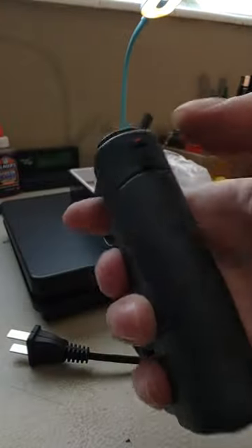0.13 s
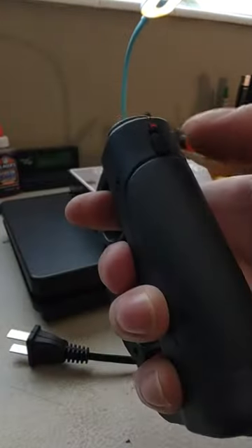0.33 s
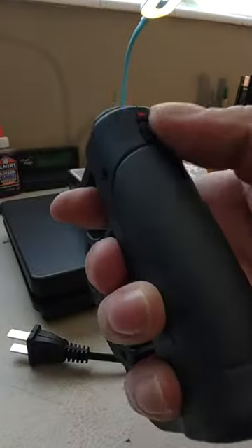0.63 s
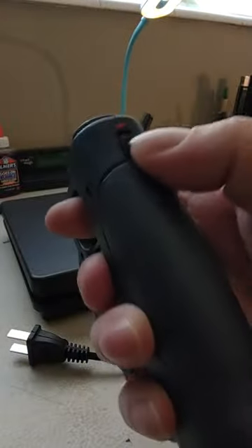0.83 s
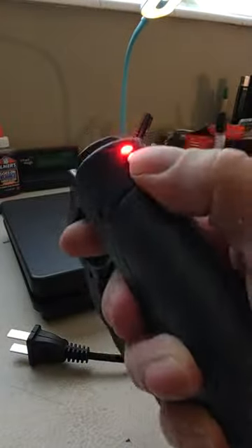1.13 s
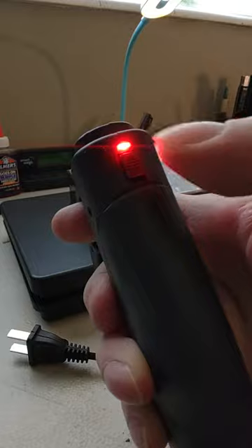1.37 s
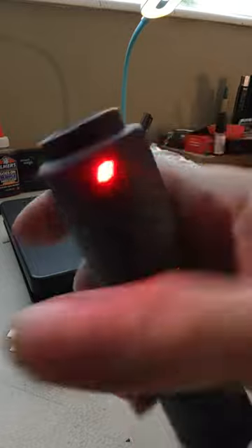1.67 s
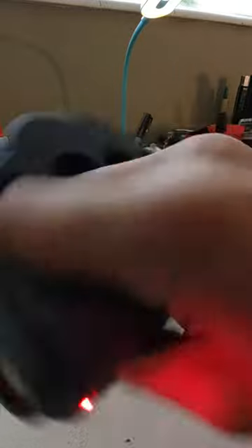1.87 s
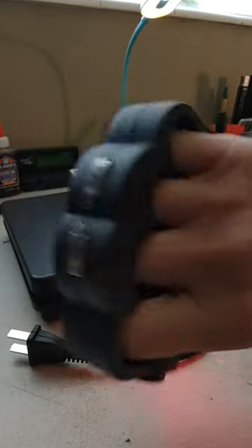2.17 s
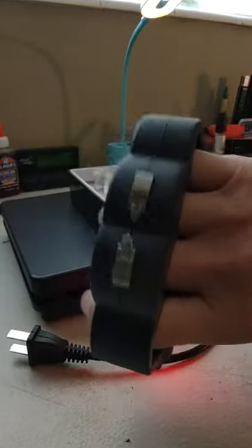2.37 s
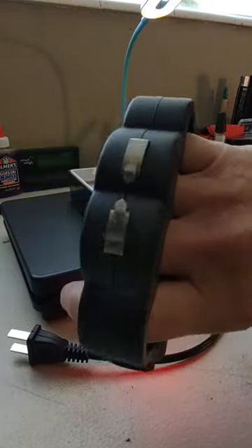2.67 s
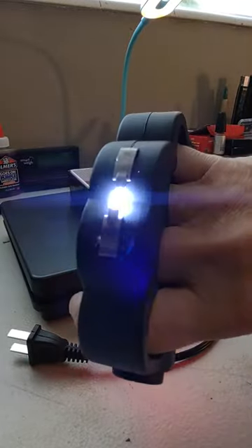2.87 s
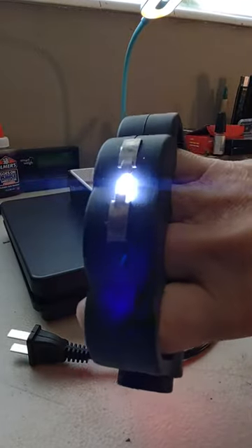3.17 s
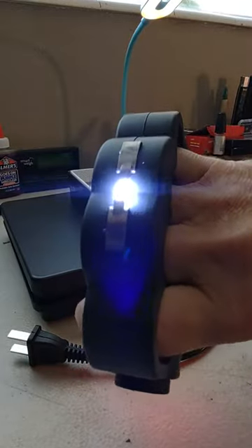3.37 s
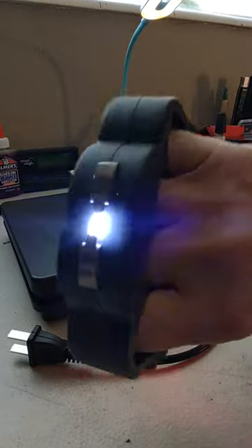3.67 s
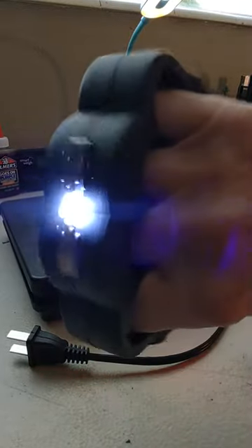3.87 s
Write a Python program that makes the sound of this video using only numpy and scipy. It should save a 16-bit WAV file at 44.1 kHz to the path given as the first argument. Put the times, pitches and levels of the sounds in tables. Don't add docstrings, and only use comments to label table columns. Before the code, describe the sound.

Harsh electric arc crackles in a loud rapid buzz after small switch clicks in a room

```python
import sys
import numpy as np
from scipy import signal
from scipy.fft import rfft, irfft, next_fast_len
from scipy.io import wavfile
from scipy.ndimage import uniform_filter1d, map_coordinates

SR = 44100
rng = np.random.default_rng(int(sys.argv[2]) if len(sys.argv) > 2 else 0)


def digitize_waveform(pressure):
    field = np.atleast_2d(pressure).T
    bounded = np.clip(field, -1, 1)
    quanta = np.round(bounded * 32767).astype(np.int16)
    wavfile.write(sys.argv[1], SR, quanta)


def level_to_linear(level):
    exponent = np.asarray(level, float) / 20
    return 10 ** exponent


N = 176400

# frequency in Hz, correlation.
ALIKE = [(60, 0.51), (180, 0.94), (550, 0.62), (1650, -0.54), (4970, -0.34), (15000, -0.67)]


def unit(x):
    return x / np.sqrt(np.mean(x ** 2) + 1e-20)


def along(points, hz):
    point_hz, value = np.transpose(points)
    return np.interp(np.log(hz + 1), np.log(point_hz + 1), value)


def wobble(rate_hz):
    knots = rng.standard_normal(int(N * rate_hz / SR) + 4)
    return map_coordinates(knots, [np.arange(N) * rate_hz / SR])


def filtered(x, response):
    size = next_fast_len(x.shape[-1] + 8192)
    spectrum = rfft(x, size) * response(np.fft.rfftfreq(size, 1 / SR))
    return irfft(spectrum, size)[..., :x.shape[-1]]


def bell(hz, centre_hz, wide):
    return np.exp(-(np.log((hz + 1) / centre_hz) / wide) ** 2)


def push(t, rise_s, fall_s):
    age = np.abs(t)
    return (1 - np.exp(-age / rise_s)) * np.exp(-age / fall_s) * (t > 0)


def decay(t, t60_s, db=0):
    return level_to_linear(db - 60 * t / t60_s)


def panned(db, pan_db):
    return level_to_linear(db + np.array([[pan_db], [-pan_db]]) / 2)


def rush(colour, alike, patchy_db):
    z = signal.stft(rng.standard_normal((2, N)), nperseg=512)[2]
    field = uniform_filter1d(rng.standard_normal(z.shape[1:]), 6, 0)
    field = uniform_filter1d(field, 8, 1)
    pair = signal.istft(z * level_to_linear(patchy_db * unit(field)), nperseg=512)[1][:, :N]

    def mid_side_gain(hz):
        angle = np.arccos(np.clip(along(alike, hz), -1, 1)) / 2
        return level_to_linear(along(colour, hz)) * [np.cos(angle), np.sin(angle)]

    mid, side = filtered(pair, mid_side_gain)
    return unit(np.array([mid + side, mid - side]))


def add(out, start_s, x):
    i = int(round(start_s * SR))
    out[:, i:i + x.shape[1]] += x[:, :max(out.shape[1] - i, 0)]


def arc():
    # time in seconds, level in dB, grip resonance in dB, depth of the shadow below it in dB.
    arc_course = [
        (2.93, -18.5, 3, 8.5),
        (3.218, -21, 1.5, 5.5),
        (3.45, -19.5, 1, 0),
        (3.91, -21, -0.5, 4.5),
        (4.0, -18, 4, 2),
    ]
    # peak over crack in dB, rise in s, fall in s, rebound share, rebound delay in s.
    overload = [
        (12, 0.00029, 0.0019, 0.37, 0.00393),
        (13, 0.00013, 0.00065, 0.64, 0.00461),
    ]
    times_s = spark_times()
    count = len(times_s)
    when_s, *columns = np.transpose(arc_course)
    level_db, grip_db, shadow_db = (np.interp(times_s, when_s, c)[:, None, None] for c in columns)
    size_db = 0.5 * rng.standard_normal((count, 2))
    left_lag_s = 0.00022
    t = np.arange(SR // 4) / SR - np.array([[left_lag_s], [0]])
    late_s = np.maximum(t - .0006, 0)

    vary = np.exp(.15 * rng.standard_normal((count, 2, 4)))
    vary[:, :, 0] *= 1 + 0.85 * np.linspace(-.5, .5, count)[:, None]
    paths = echo_paths(count, t.shape)
    booms = boom(paths, late_s)
    cracks = crack_envelope(late_s) * crack_noise(paths, grip_db, shadow_db)

    out = np.zeros((2, N))
    for k, start_s in enumerate(times_s):
        thumps = np.array([thump(t[c], overload[c], vary[k, c]) for c in (0, 1)])
        add(out, start_s, level_to_linear(level_db.mean() + size_db[k, 0]) * (thumps + booms[k]))
        add(out, start_s, level_to_linear(level_db[k] + 2.5 + size_db[k, 1]) * cracks[k])
    return out


def spark_times():
    # time in seconds, sparks fired so far.
    fired = [
        (2.929, 0),
        (3.042, 5),
        (3.1532, 10),
        (3.2746, 15),
        (3.3842, 20),
        (3.5348, 27),
        (3.6621, 33),
        (3.82, 41),
        (3.9955, 49),
    ]
    due_s, total = np.transpose(fired)
    count = int(total[-1]) + 1
    stray_s = .0012 + .0016 * rng.standard_normal(count)
    stray_s[0] = 0
    return np.interp(np.arange(count), total, due_s) - .0022 + stray_s


def thump(t, row, vary):
    db, rise_s, fall_s, share, delay_s = row
    pulse = push(t, rise_s, fall_s * vary[0])
    pulse = pulse - share * vary[1] ** 2 * push(t - delay_s * vary[2] + 0.0006, 0.00057, .0012)
    pulse = pulse + 0.13 * vary[3] ** 2 * push(t - 0.00974, rise_s, fall_s)
    return level_to_linear(db) * pulse / pulse.max()


def echo_paths(count, shape):
    warm_up = 5
    fresh = rng.standard_normal((count + warm_up, *shape))
    return signal.lfilter([1], [1, -.75], fresh, axis=0)[warm_up:]


def boom(paths, late_s):
    # frequency in Hz, density in dB per Hz.
    boom_colour = [(40, -12), (90, 9.5), (250, -0.5), (400, 1), (700, -29)]
    noise = unit(filtered(paths + 0.49 * paths[:, ::-1], lambda hz: level_to_linear(along(boom_colour, hz))))
    return noise * level_to_linear(-2) * push(late_s, 0.0054, .08 / np.log(1000))


def crack_envelope(late_s):
    burst_t60_s, wall_s = .014, .0068
    shape = decay(late_s, burst_t60_s, 4)
    shape = shape + level_to_linear(-1) * push(late_s - wall_s, 0.0014, burst_t60_s / np.log(1000))
    shape = shape + decay(late_s, 0.13) + decay(late_s, 0.58, -2.5)
    clumps_db = 2 * np.array([wobble(890), wobble(880)])[:, :late_s.shape[1]]
    return (1 - np.exp(-late_s / 0.00021)) * shape * level_to_linear(clumps_db)


def crack_noise(paths, grip_db, shadow_db):
    # frequency in Hz, density in dB per Hz.
    crack_colour = [(200, -18), (500, -8), (1200, -4.5), (2400, -3), (4000, -0.5), (7000, -2.5),
                    (13000, -5.5), (16000, -7.5)]

    def response(hz):
        grip = bell(hz, 3900, .14) + 2.07 * bell(hz, 730, 0.37)
        return level_to_linear(along(crack_colour, hz) + grip_db * grip - shadow_db * bell(hz, 2350, .18))

    return unit(filtered(paths, response))


def switch():
    # start in seconds, peak in dB, ring in Hz, left minus right in dB, brightness in dB.
    clicks = [
        (1.0172, -32, 4280, -5, -6),
        (1.052, -35, 2830, -8, 1),
        (1.2548, -29.5, 7200, 4.5, -6.5),
        (1.318, -37.5, 2750, -6, -12),
        (1.3982, -47.5, 3960, 2, -5),
        (1.7075, -25, 7740, -7, -9),
        (1.7087, -26, 4150, 0, -8),
        (1.7124, -28.5, 3920, 4, -9),
        (2.9028, -10, 5030, -1.5, -14.5),
    ]
    out, t = np.zeros((2, N)), np.arange(SR // 8) / SR
    knock = decay(t, 0.029, -18) * np.sin(2 * np.pi * 610 * t)
    rise = 1 - np.exp(-t / 0.00049)
    for start_s, db, ring_hz, pan_db, bright_db in clicks:
        noise = rng.standard_normal((3, 2, len(t)))
        ring = unit(filtered(noise[0], lambda hz: bell(hz, ring_hz, 0.28)))
        snap, tail = unit(filtered(noise[1:], lambda hz: bell(hz, ring_hz, 1.1)))
        body = ring * decay(t, 0.015) + snap * decay(t, 0.011, 8 + bright_db)
        body = body + tail * decay(t, .1, -27) + knock
        add(out, start_s, panned(db - 7, pan_db) * body * rise)
    return out


def hand():
    # middle in seconds, length in seconds, level in dB, left minus right in dB.
    rubs = [(.066, 0.056, -52.5, -3), (0.629, 0.078, -57.5, 1), (.75, 0.16, -63.5, -2),
            (.84, 0.11, -65.5, -2), (0.964, 0.19, -72, 0), (1.058, 0.057, -50.5, 6),
            (1.295, 0.099, -65, -1), (1.359, 0.083, -58.5, 0), (1.702, 0.0071, -53, 6),
            (1.74, 0.059, -62, 3), (1.792, 0.084, -52.5, -1), (1.897, 0.14, -56, -2),
            (2.02, 0.032, -61.5, -2), (2.065, 0.071, -59, -1), (2.104, 0.16, -64.5, -6),
            (2.3, 0.19, -68, -3), (2.471, 0.11, -55.5, -4), (2.67, 0.096, -72, -4)]
    focus_hz = [1940, 4400, 6200, 6050, 4000, 10700, 11500, 4340, 5500, 5000, 10400, 5100, 7000, 7460, 4400,
                4960, 13000, 4000]
    # frequency in Hz, density in dB per Hz.
    skin_colour = [(900, -9), (1800, -9.5), (4500, -1.5), (8500, -5), (11500, -5), (16000, -10.5)]
    out = np.zeros((2, N))
    skin = level_to_linear(1.8 * wobble(350)) * rush(skin_colour, [(1000, 0.042)], patchy_db=0.8)
    for (middle_s, length_s, db, pan_db), centre_hz in zip(rubs, focus_hz):
        i = int((middle_s - length_s / 2) * SR)
        progress = np.arange(int(length_s * SR)) / SR / length_s
        stroke = skin[:, i:i + len(progress)]
        grain = unit(filtered(stroke, lambda hz: level_to_linear(6 * bell(hz, centre_hz, .12))))
        add(out, i / SR, panned(db, pan_db) * np.sin(np.pi * progress) ** 2 * grain)
    return out


def car():
    # time in seconds, nearness as level in dB.
    approach = [
        (0.0, -70.5),
        (0.19, -70),
        (1.37, -65),
        (1.7, -63.5),
        (2.14, -61.5),
        (2.88, -60.5),
    ]
    # frequency in Hz, density in dB per Hz.
    engine_colour = [(150, -0.5), (270, 3), (400, -3.5), (600, 1.5), (900, 2.5), (1100, -2), (2000, -19.5)]
    tyre_colour = [(800, -12), (1300, -5.5), (1900, -8), (2600, -31), (5000, -36)]
    rumble_colour = [(25, -38), (45, -18), (60, 10), (85, -19), (120, 3), (170, -14.5), (260, -22.5),
                     (400, -58)]
    near_db = np.interp(np.arange(N) / SR, *np.transpose(approach))
    rise_db = near_db - near_db.max()
    engine = level_to_linear(near_db + wobble(3.52)) * rush(engine_colour, ALIKE, patchy_db=2.3)
    tyres = level_to_linear(near_db.max() - 6.5 + 1.5 * rise_db) * rush(tyre_colour, ALIKE, patchy_db=4.0)
    rumble = level_to_linear(-62 + 0.39 * rise_db + wobble(6.2)) * rush(rumble_colour, ALIKE, patchy_db=-0.6)
    return engine + tyres + rumble


def fan():
    # frequency in Hz, relative width, level in dB.
    resonances = [(253, .07, -76), (564, .07, -70), (854, .05, -68)]
    air = rush([(100, 0)], ALIKE, patchy_db=2.0)
    return filtered(air, lambda f: sum(level_to_linear(db + 16) * bell(f, hz, wide) for hz, wide, db in resonances))


def mains_hum():
    # frequency in Hz, level in dB.
    harmonics = [(60, -76), (120, -74)]
    t, hum = np.arange(N) / SR, np.zeros(N)
    for hz, db in harmonics:
        hum += level_to_linear(db + 3.5 * wobble(9)) * np.sin(2 * np.pi * hz * t + 1.3 * wobble(9))
    return hum


def hiss():
    # frequency in Hz, density in dB per Hz.
    hiss_colour = [(500, -10), (2000, 1.5), (4000, 3), (8000, -3.5), (16000, -12)]
    return level_to_linear(-78) * rush(hiss_colour, [(1000, 0.005)], patchy_db=-0.3)


def scene():
    return arc() + switch() + hand() + car() + fan() + mains_hum() + hiss()


def low_pass(x):
    return signal.sosfilt(signal.butter(12, 16670, fs=SR, output="sos"), x)


def record(dry):
    clip_top, clip_hard = 1.02, 3.5
    low_cut_hz, top_hz, edge_hz = 70, 15900, 500
    clipped = dry / (1 + np.abs(dry / clip_top) ** clip_hard) ** (1 / clip_hard)

    def response(hz):
        low_cut = hz ** 3 / (hz ** 3 + low_cut_hz ** 3)
        past_edge = np.clip((hz - top_hz) / edge_hz + .5, 0, 1)
        return low_cut * np.cos(np.pi / 2 * past_edge) ** 2

    return low_pass(filtered(clipped, response))


dry = scene()
out = record(dry)
digitize_waveform(out)
```